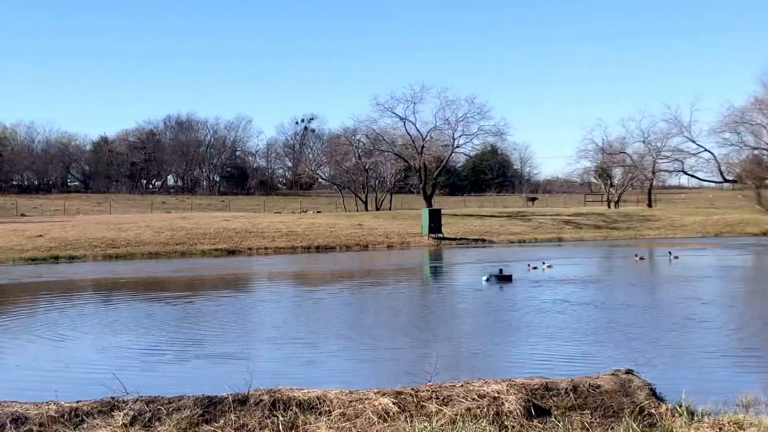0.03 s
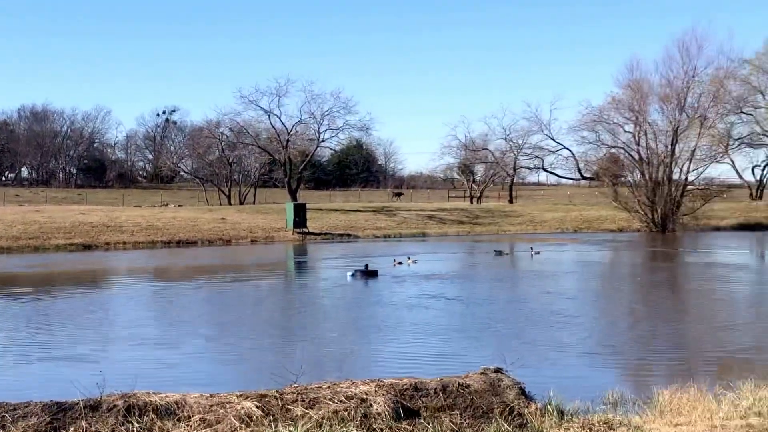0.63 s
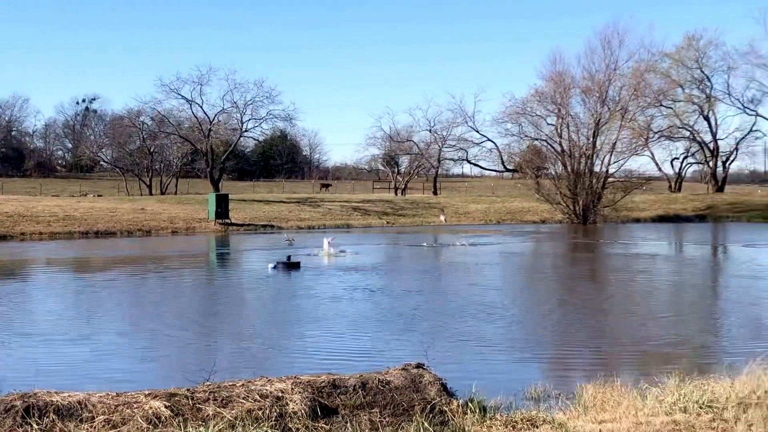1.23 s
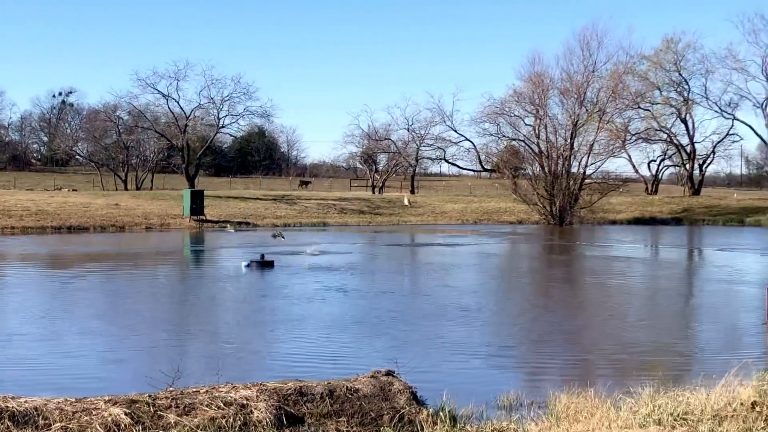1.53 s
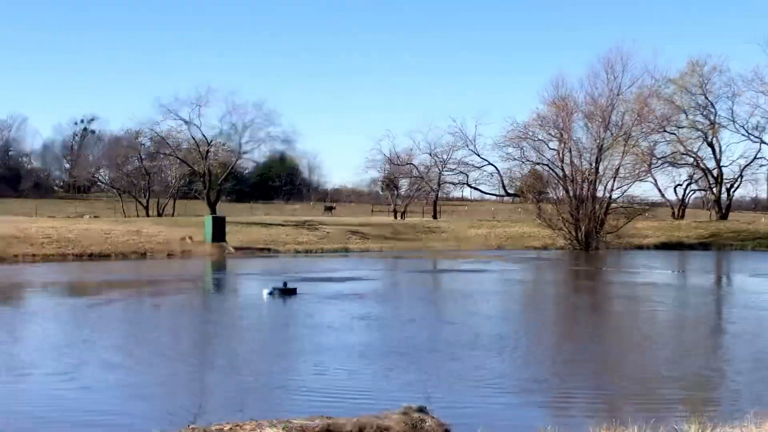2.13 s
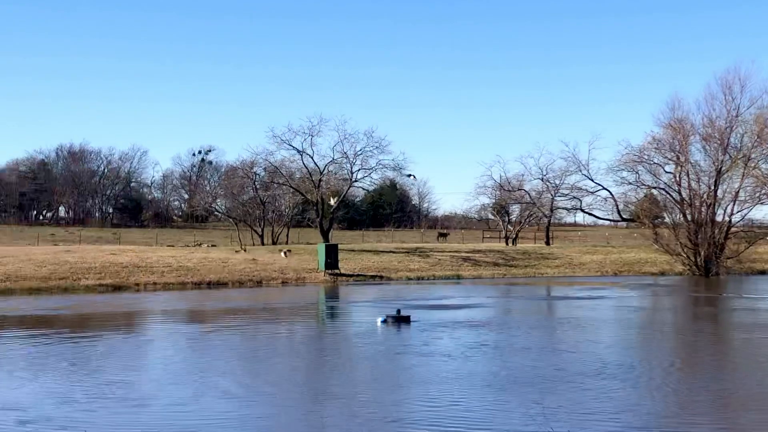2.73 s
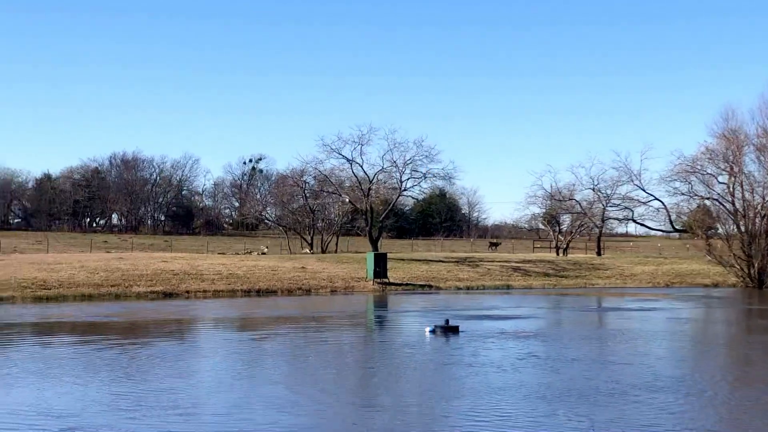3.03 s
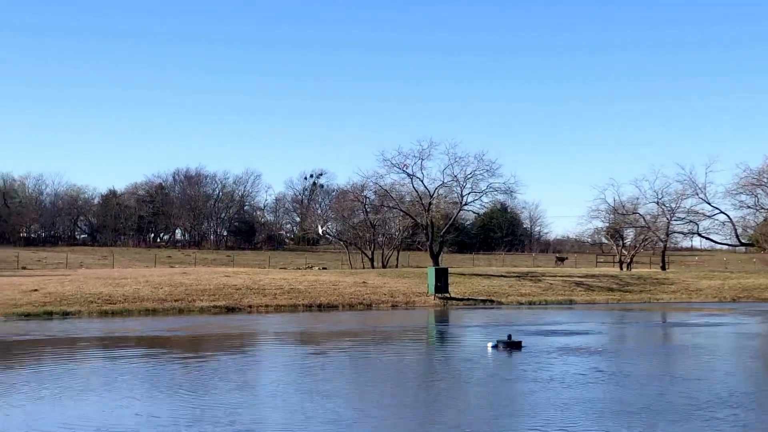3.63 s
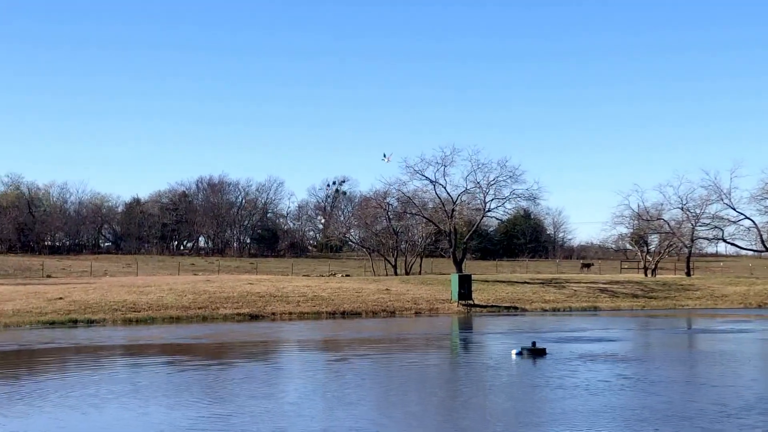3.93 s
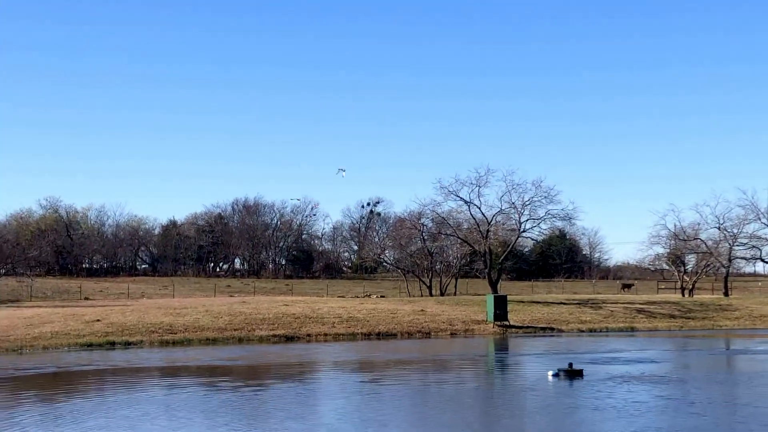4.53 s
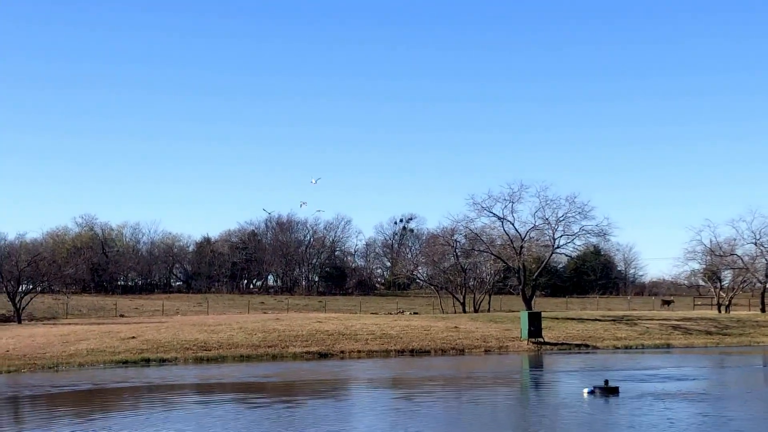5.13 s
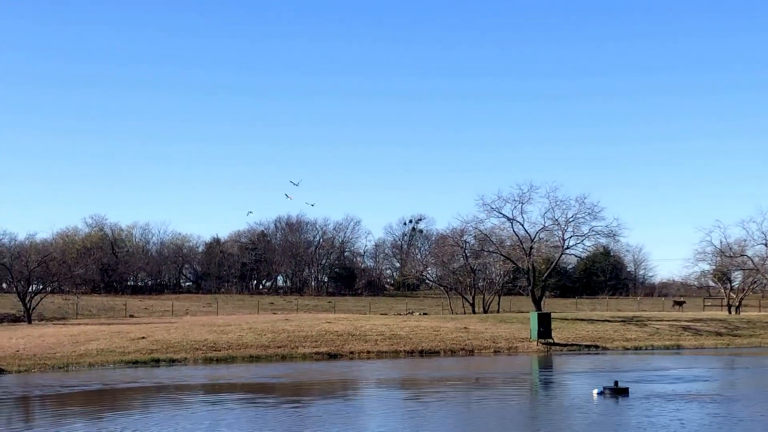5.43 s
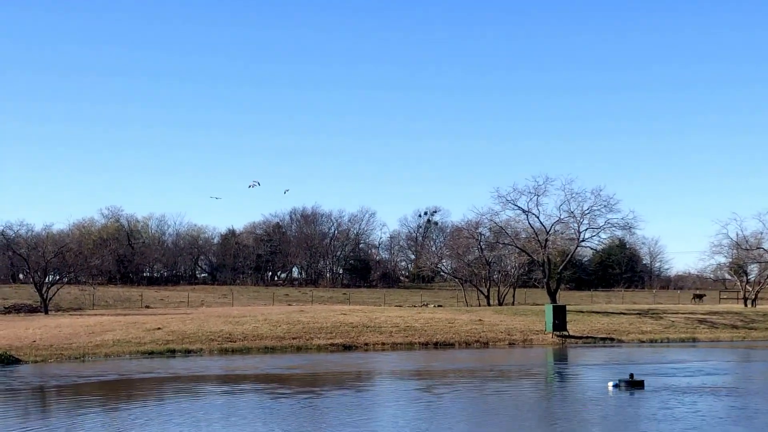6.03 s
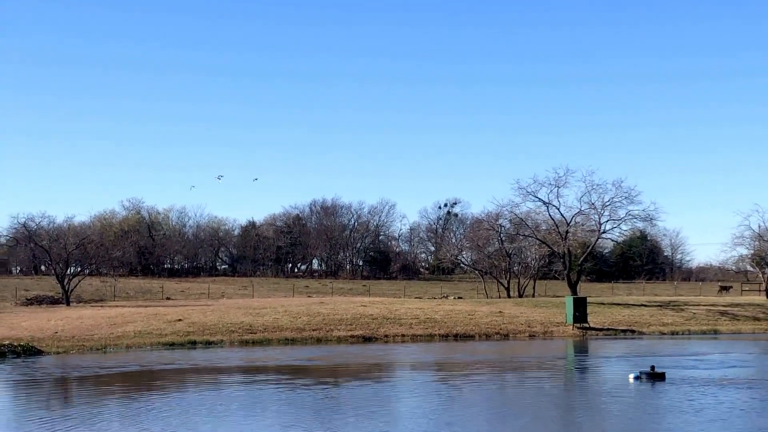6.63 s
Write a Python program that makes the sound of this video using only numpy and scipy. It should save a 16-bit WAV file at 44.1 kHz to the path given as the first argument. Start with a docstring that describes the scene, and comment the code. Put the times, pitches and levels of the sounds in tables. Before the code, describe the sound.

Ducks splash off a pond and quack a few times in flight, while wind rumbles on the microphone and a distant engine drones.

```python
"""Ducks leaving a farm pond

Heard from the bank, ducks patter off the water with slaps and spray, then quack as they climb away,
each quack a rasping pulse train that rings the throat. A far engine drones under the murmur of open
country; a jacket sleeve swishes and small plips sound close by. Wind nudges the microphone throughout
and buffets it hard in the last second."""
import sys
import numpy as np
from scipy import signal
from scipy.fft import rfft, irfft
from scipy.io import wavfile
from scipy.ndimage import uniform_filter1d, minimum_filter1d

SR = 44100
rng = np.random.default_rng(int(sys.argv[2]) if len(sys.argv) > 2 else 0)


def wav_record(signal):
    """Record a signal, one row per channel, as 16-bit PCM in the file named by sys.argv[1]."""
    frames = np.transpose(np.atleast_2d(signal))
    bounded = np.clip(frames, -1, 1)
    # unit amplitude maps onto the largest positive 16-bit level
    quanta = np.round(bounded * 32767).astype(np.int16)
    wavfile.write(sys.argv[1], SR, quanta)


N = 299880
TIME = np.arange(N) / SR


def undb(db):
    """Decibels to gain."""
    return 10 ** (np.asarray(db) / 20)


def unit(x):
    """Scale to rms 1."""
    return x / np.sqrt(np.mean(x ** 2) + 1e-20)


def curve(rows):
    """A fader ride: (time, level) points joined by straight lines."""
    return np.interp(TIME, *np.transpose(rows))


def since(start):
    """Seconds gone by since a moment, 0 before it."""
    return np.maximum(TIME - start, 0)


def swell(peak_s, db, half_s):
    """The bell-shaped envelope of a push of air."""
    return undb(db) * np.exp(-.5 * ((TIME - peak_s) / half_s) ** 2)


def colour(x, points):
    """EQ by a (Hz, dB) spectrum; the result has rms 1."""
    hz, db = np.transpose(points)
    bins = np.maximum(np.arange(N // 2 + 1) * SR / N, 1)
    gain = undb(np.interp(np.log(bins), np.log(hz), db))
    return unit(irfft(rfft(x) * gain, N))


def tilted(points, db_per_octave):
    """A spectrum made brighter or duller."""
    return [(hz, db + db_per_octave * np.log2(hz)) for hz, db in points]


def resonate(x, hz, width_hz):
    """Two-pole resonance, gain 1 at its centre."""
    return signal.lfilter(*signal.iirpeak(hz, hz / width_hz, fs=SR), x)


def passband(order, edges_hz):
    """The sections of a band-pass filter."""
    return signal.butter(order, edges_hz, "bandpass", fs=SR, output="sos")


def noise():
    """White noise."""
    return rng.standard_normal(N)


def walk(rate):
    """Smooth random wander with spread 1."""
    span = max(int(SR / rate), 1)
    smoothed = uniform_filter1d(noise(), span, mode="wrap")
    return unit(uniform_filter1d(smoothed, span, mode="wrap"))


def grains(rate, spread_db):
    """Random tiny impacts of uneven size, about `rate` a second."""
    sizes = undb(spread_db * np.minimum(rng.exponential(size=N), 4))
    return unit((rng.random(N) < rate / SR) * sizes * noise())


def traffic(gain_db=4, flutter_db=1.0):
    """The murmur of far roads, hollowed near 450 Hz by the ground."""
    # the murmur's rise and fall (time [s], level [dB])
    ride = [(0, -54), (.6, -52), (1.0, -54.5), (2.2, -52), (3.7, -52.5), (4.5, -49), (5.3, -49),
            (5.7, -50.5), (6.1, -49), (6.8, -53.5)]
    # its spectrum (frequency [Hz], level [dB])
    spectrum = [(25, -17), (60, 13), (120, 1.5), (200, 4), (300, -0.5), (440, -15), (560, -9.5), (720, 0),
                (900, -1), (1100, -7), (1500, -15.5), (2000, -35), (3000, -47.5)]
    return colour(noise(), spectrum) * undb(curve(ride) + gain_db + flutter_db * walk(23))


def trees(flutter_db=1.0):
    """Wind in bare trees: a soft midrange rush."""
    # the rush's rise and fall (time [s], level [dB])
    ride = [(0, -49), (.6, -54), (1.1, -50), (2.0, -53), (3.0, -49), (4.4, -52), (5.2, -49), (6.0, -54.5),
            (6.8, -53)]
    # its spectrum (frequency [Hz], level [dB])
    spectrum = [(400, -22), (800, -7.5), (1050, -5), (1230, 0), (1480, -7), (1750, -18.5), (2000, -30.5),
                (3000, -48), (6000, -68.5)]
    return colour(noise(), spectrum) * undb(curve(ride) + flutter_db * walk(25))


def grass(flicker_db=1.43):
    """Dry grass gives a grainy hiss and a fine, high crackle."""
    # the hiss's rise and fall (time [s], level [dB])
    hiss_ride = [(0, -62), (3.4, -63.5), (4.5, -67), (6.8, -66)]
    # its spectrum (frequency [Hz], level [dB])
    hiss_spectrum = [(1000, 9), (2200, 1), (3100, 1), (3700, -4), (5000, -8), (6500, -8.5), (9000, -12.5),
                     (15500, -12.5)]
    # the crackle's rise and fall (time [s], level [dB])
    crackle_ride = [(4.2, -80), (4.7, -85.5), (5.3, -79), (5.9, -83), (6.3, -85.5)]
    hiss = colour(noise() + 0.49 * grains(rate=2600, spread_db=5.0), hiss_spectrum)
    hiss *= undb(curve(hiss_ride) + flicker_db * walk(50))
    stalks = grains(rate=120, spread_db=-2.5)
    crackle = colour(stalks, [(2500, -29), (3600, -3), (4400, 6), (5200, -2.5), (6200, -25.0)])
    return hiss + crackle * undb(curve(crackle_ride))


def thin_tones(flicker_db=1.2, fade_s=.16):
    """Narrow, flickering bands of noise high above the murmur."""
    # faint tones over the fields (centre [Hz], width [Hz], start [s], end [s], level [dB])
    bands = [(3060, 170, 0.095, 3.62, -78.5), (3600, 250, 1.8, 3.6, -81), (4070, 180, 0, 6.8, -84.5),
             (5040, 200, 1, 6.8, -84)]
    out = 0
    for hz, width, start, end, db in bands:
        gate = np.clip(np.minimum(TIME - start, end - TIME) / fade_s, 0, 1)
        tone = unit(resonate(resonate(noise(), hz, width), hz, width))
        out += tone * gate * undb(db + flicker_db * walk(23))
    return out


def engine(drift=0.003985):
    """A far engine's drone grows louder, its partials drifting slightly in pitch together."""
    # the drone's build (time [s], level [dB])
    ride = [(0, -50.5), (2.2, -46.5), (2.8, -42.5), (3.4, -40), (4.3, -39), (5.1, -37.5), (5.8, -38.5),
            (6.8, -25.5)]
    # its partials (frequency [Hz], level [dB])
    partials = [(111.2, 3.5), (152.5, -4.5), (180.5, -10), (234, -18), (292, -29), (331, -32)]
    drifting_time = np.cumsum(1 + drift * walk(1.247)) / SR
    drone = sum(undb(db) * np.sin(2 * np.pi * hz * drifting_time) for hz, db in partials)
    return drone * undb(curve(ride))


def pips(start_s=0.41, end_s=0.84, per_s=26, hz=3400, level_db=-68.5):
    """A faint, quick run of unsteady whistles, perhaps a small bird."""
    beat = np.sin(np.pi * np.cumsum(per_s * (1 + 0.18 * walk(15))) / SR) ** 4
    tone = np.sin(2 * np.pi * np.cumsum(hz * (1 + 0.087 * walk(400))) / SR)
    gate = np.clip(np.minimum(TIME - start_s, end_s - TIME) * per_s, 0, 1)
    return tone * beat * gate * undb(level_db + 4.5 * walk(20))


def eddies(spectrum):
    """Turbulence of even strength, so that the wind speed alone sets its level."""
    swirl = colour(noise(), spectrum)
    power = signal.fftconvolve(swirl ** 2, np.hanning(1800) / 900, "same")
    return unit(swirl / np.sqrt(power + 0.021))


def breeze(gain_db=-1, dull_db_per_octave=-4, waver_db=2.5):
    """Slow air makes large, dull eddies on the microphone; sharp puffs mix in smaller ones."""
    # the steady breeze (time [s], level [dB])
    ride = [(0, -42), (.45, -38), (.7, -43), (1.2, -37.5), (1.5, -37), (2.1, -41.5), (2.75, -37.5),
            (3.1, -43), (3.9, -37), (5.0, -43.5), (5.8, -34)]
    # spectrum of the small eddies (frequency [Hz], level [dB])
    spectrum = [(18, -51), (30, -19.5), (55, -3), (88, 2), (125, -2), (180, -7.5), (250, -18.5),
                (330, -24.5), (480, -45.5), (640, -56), (2000, -77)]
    # puffs of air (time [s], level [dB], half length [s], share of large eddies [0-1])
    puffs = [(.022, -25, 0.019, .05), (.165, -30.5, 0.027, 0.076), (.3, -33.5, 0.034, .2),
             (.4, -34, 0.033, 0.17), (0.888, -20, 0.011, 0.33), (1.004, -29, 0.036, 0.22),
             (1.12, -28, 0.045, 0.68), (1.22, -27, 0.019, 0.41), (1.726, -26, 0.0069, 0.067),
             (1.81, -33.5, 0.035, 1), (2.273, -25.5, 0.011, 0.85), (2.488, -30.5, 0.028, 0.99),
             (3.55, -32.5, 0.018, 0.79), (3.89, -33.5, 0.019, 0.8), (4.165, -29, 0.018, 0.95),
             (4.75, -32, 0.029, 1), (5.417, -30.5, .016, 1.0)]
    dull = tilted(spectrum, dull_db_per_octave)
    out = eddies(dull) * undb(curve(ride) + gain_db + waver_db * walk(14))
    large, small = eddies(dull), eddies(spectrum)
    for peak_s, db, half_s, share in puffs:
        out += (np.sqrt(share) * large + np.sqrt(1 - share) * small) * swell(peak_s, db, half_s)
    return out


def buffet_hiss(force, full_at_db=-7.5, hold_s=0.068, level_db=-62.5):
    """A faint, bright hiss comes in during the hardest buffets and for a moment after them."""
    hold = int(hold_s * SR)
    held_peak = -minimum_filter1d(-force, hold, origin=(hold - 1) // 2)
    opened = np.minimum(held_peak / undb(full_at_db), 1) ** 6
    hiss = colour(noise(), [(1000, 1.5), (2500, -5.5), (6000, -9.0), (15000, -12.5)])
    return hiss * opened * undb(level_db)


def wind(ceiling=.85, rumble_hz=(26, 680)):
    """The breeze rumbles on the microphone, then a gust tears smaller eddies off its port."""
    # the body of the gust (time [s], level [dB])
    ride = [(5.6, -79), (5.9, -28), (6.2, -35), (6.36, -18), (6.6, -26.5), (6.69, -26), (6.8, -21.5)]
    # its buffets (time [s], level [dB], half length [s])
    buffets = [(5.951, -21.5, 0.0094), (6.041, -19.5, .012), (6.102, -11.5, 0.016), (6.24, -18.5, 0.0064),
               (6.37, -8, .016), (6.426, -6.5, 0.01), (6.51, -13.5, 0.0089), (6.587, -5, 0.025),
               (6.771, -9, 0.01)]
    # its spectrum (frequency [Hz], level [dB])
    spectrum = [(18, -47), (30, -19.5), (55, -2), (88, 4.5), (125, -6.5), (180, -5), (250, -10.5),
                (330, -14.5), (410, -23.5), (500, -38), (640, -51), (2000, -72), (4000, -103.5)]
    light_air = breeze()
    body = undb(curve(ride)) * (TIME > ride[0][0])
    force = np.sqrt(body ** 2 + sum(swell(*row) ** 2 for row in buffets))
    # the diaphragm gives less and less as the pressure nears full scale
    gust = ceiling * np.tanh(eddies(spectrum) * force / ceiling)
    rumble = signal.sosfiltfilt(passband(4, rumble_hz), light_air + gust, padtype=None)
    return rumble + buffet_hiss(force)


def ticks(decay_s=.0012):
    """Short dry snaps of cloth or grass."""
    # faint snaps near the microphone (time [s], level [dB], centre [Hz])
    snaps = [(1.314, -52, 12000), (1.378, -50, 7040), (2.117, -51, 9700), (4.255, -58, 8000),
             (4.908, -56, 7000), (5.252, -55, 6500), (5.919, -58, 6950), (6.256, -55, 6000)]
    out, age = np.zeros(N), TIME[:SR // 50]
    for start, db, hz in snaps:
        burst = rng.standard_normal(len(age)) * np.exp(-age / decay_s)
        first = int(start * SR)
        out[first:first + len(age)] += undb(db) * resonate(burst, hz, hz / 2)
    return out


def sleeve(gain_db=3, uneven_db=-1.5, attack_s=0.071, release_s=.035, settle_db=-7.5, settle_s=0.22):
    """Threads catch and slip in a fine hiss; each stroke speeds up, holds and dies as the cloth settles."""
    # strokes of the sleeve (start [s], length [s], level [dB], tilt [dB/octave])
    rubs = [(0.04, 0.32, -64.5, 0.8), (0.963, 0.26, -62, 1.8), (1.28, 0.1, -71.5, -0.5),
            (1.827, 0.21, -68, 2), (2.538, 0.11, -66.5, 1)]
    # spectrum of the cloth (frequency [Hz], level [dB])
    spectrum = [(1200, -10), (2400, 10), (3200, 8.5), (4200, -5), (5600, 7), (7000, -1.5), (8800, -6),
                (10000, 2), (12000, -1.5), (15000, 0.5)]
    threads, out = grains(rate=14000, spread_db=2.5), 0
    for start, length, db, tilt in rubs:
        after = since(start + length)
        release = np.maximum(np.exp(-after / release_s), undb(settle_db) * np.exp(-after / settle_s))
        speed = np.minimum(since(start) / attack_s, 1) * release
        out += colour(threads, tilted(spectrum, tilt)) * speed * undb(db)
    return out * undb(gain_db + uneven_db * walk(25))


def plips():
    """Small plips close by, each a few cycles of a quickly falling tone."""
    # downward sweeps (time [s], level [dB], from [Hz], to [Hz], length [s])
    sweeps = [(0.075, -37.5, 980, 298, 0.0037), (0.327, -35, 1310, 1170, 0.0052),
              (0.476, -31.5, 1600, 310, 0.006), (.685, -36, 1490, 1380, 0.0061),
              (0.973, -41, 1010, 330, 0.0049), (1.259, -33, 1120, 350, 0.0029),
              (1.435, -33.5, 870, 390, 0.0024), (1.509, -38, 795, 294, 0.0041),
              (1.585, -43, 646, 520, 0.013), (2.229, -37, 790, 298, 0.0038), (2.596, -37, 696, 277, 0.0027),
              (3.803, -40, 890, 347, 0.0058), (3.933, -38, 950, 268, 0.0044)]
    out = np.zeros(N)
    for start, db, from_hz, to_hz, length in sweeps:
        progress = np.linspace(0, 1, int(length * SR))
        phase = 2 * np.pi * np.cumsum(from_hz * (to_hz / from_hz) ** progress) / SR
        first = int(start * SR)
        out[first:first + len(phase)] += undb(db) * np.sin(np.pi * progress) * np.sin(phase)
    return out


def splashes(slap_db=-2, spray_db=-10, spray_peak_s=0.04):
    """Each stroke slaps the water and throws up a cloud of drops that fall back on the pond."""
    # feet and wings striking the water (time [s], level [dB], slap decay [s])
    strokes = [(1.0, -42, 0.0097), (1.084, -37, .017), (1.132, -50, 0.014), (1.173, -37, 0.017),
               (1.233, -39.5, 0.0066), (1.313, -43.5, 0.04), (1.41, -42, 0.021), (1.472, -42, 0.032),
               (1.858, -39.5, 0.0078), (1.885, -54, .008), (1.918, -58, 0.007), (1.969, -45, .012),
               (2.01, -48, 0.016)]
    # spectrum of the splashing (frequency [Hz], level [dB])
    spectrum = [(300, -24), (600, -13), (950, -7), (1250, 0.5), (1520, -2), (1900, -24.5), (2400, -19),
                (4000, -48), (7500, -35.5), (12000, -57)]
    slap_gain, spray_power = np.zeros(N), np.zeros(N)
    age = TIME[:SR // 2]
    landing = age / spray_peak_s * np.exp(1 - age / spray_peak_s)
    for start, db, decay in strokes:
        first = int(start * SR)
        slap_gain[first:first + len(age)] += undb(db + slap_db) * np.exp(-age / decay)
        spray_power[first:first + len(age)] += (undb(db + spray_db) * landing) ** 2
    spray = colour(grains(rate=2300, spread_db=3.5), spectrum) * np.sqrt(spray_power)
    return spray + colour(noise(), spectrum) * slap_gain


def throat(source, tuning, strengths_db, flutters, flutter_db=0.3, leak_hz=(1720, 2150), leak_db=-10.5):
    """Throat and bill ring in five bands; a little sound leaks between the third and the fourth."""
    # resonances of throat and bill (centre [Hz], width [Hz])
    formants = [(720, 190), (1250, 280), (1590, 205), (2220, 345), (2820, 350)]
    voice = signal.sosfilt(passband(2, leak_hz), source) * undb(leak_db + strengths_db[2])
    for (hz, width), db, flutter in zip(formants, strengths_db, flutters):
        band = passband(3, [hz * tuning - width / 2, hz * tuning + width / 2])
        voice += signal.sosfilt(band, source * undb(db + flutter_db * flutter))
    return voice


def quack(start, length, top_hz, level_db, rasp, catch_db, tuning, *strengths_db):
    """The syrinx snaps shut once a cycle and lets a puff of air through; both ring the throat."""
    attack_s, release_s, catch_half_s = 0.02, 0.024, .009
    rise_hz_per_s, sag_hz_per_s = 240, 248
    jitter, shimmer_db = .02, -1.0
    on = (TIME >= start) & (TIME <= start + length)
    age = TIME[on] - start
    past_top = age - .68 * length
    pitch = top_hz + np.minimum(rise_hz_per_s * past_top, -sag_hz_per_s * past_top)
    effort = (1 - np.exp(-age / attack_s)) * np.minimum((length - age) / release_s, 1)
    # the voice catches just past mid-call: a brief dip or bump in level
    effort *= undb(catch_db * np.exp(-.5 * ((age - .6 * length) / catch_half_s) ** 2))
    cycle = (np.cumsum(pitch) / SR).astype(int)
    pitch_scatter, level_scatter, *flutters = rng.standard_normal((64, 2 + len(strengths_db)))[cycle].T
    # rasp makes the cycles uneven and lets more air through
    phase = np.cumsum(pitch * (1 + jitter * rasp * pitch_scatter)) / SR
    snaps = np.diff(np.floor(phase), prepend=0) * undb(shimmer_db * level_scatter)
    air = np.exp(-(phase % 1) / .45) * noise()[:len(phase)]
    source = (1 - rasp) * unit(snaps) + rasp * unit(air)
    out = np.zeros(N)
    out[on] = unit(throat(source, tuning, strengths_db, flutters)) * effort * undb(level_db)
    return out


def ducks():
    """One faint quack before the take-off, then five in flight."""
    # quacks (start [s], length [s], top pitch [Hz], level [dB], rasp [0-1], catch [dB],
    #         throat tuning [ratio], strength of each of the five resonances [dB])
    calls = [(.14, .06, 168, -57, 0.77, 0, 1, -14, 0, -6, 0, -8),
             (1.656, 0.097, 159.5, -44, 0.87, 2, 0.99, -3, 10, 0, -14, -12),
             (2.145, .145, 175, -48, 0.41, 1.5, 1, 0, 1.5, -2.5, -6, -11.5),
             (2.607, .175, 172.7, -45.5, 0.53, -6, 0.97, 3, 0, 8, 4.5, -2.5),
             (3.128, .174, 177.5, -43.5, .38, 0.5, 0.969, -3, 2, 9.5, -1.5, -24),
             (3.873, .147, 173, -45, 0.59, -1, .99, -22, 6, 3, 0, -12)]
    return sum(quack(*call) for call in calls)


def banks(x, t60_s=1.3, wet_db=-14, predelay_s=0.027):
    """The banks and the tree line scatter a faint, dull tail."""
    age = TIME[:SR]
    tail = noise()[:SR] * undb(-60 * age / t60_s) * (age > predelay_s)
    tail = resonate(tail / np.sqrt(np.sum(tail ** 2)), hz=1600, width_hz=1500)
    return x + undb(wet_db) * signal.fftconvolve(x, tail)[:N]


def scene():
    """A mono mix of dry close sounds, the birds across the water and the country bed."""
    near = plips() + ticks() + sleeve() + wind()
    birds = banks(ducks() + splashes() + pips())
    bed = engine() + traffic() + trees() + grass() + thin_tones()
    return (near + birds + bed)[None]


def record(dry, top_hz=15750):
    """A steep low-pass cuts the very top."""
    return signal.sosfilt(signal.ellip(10, .2, 80, top_hz, fs=SR, output="sos"), dry)


dry = scene()
out = record(dry)
wav_record(out)
```